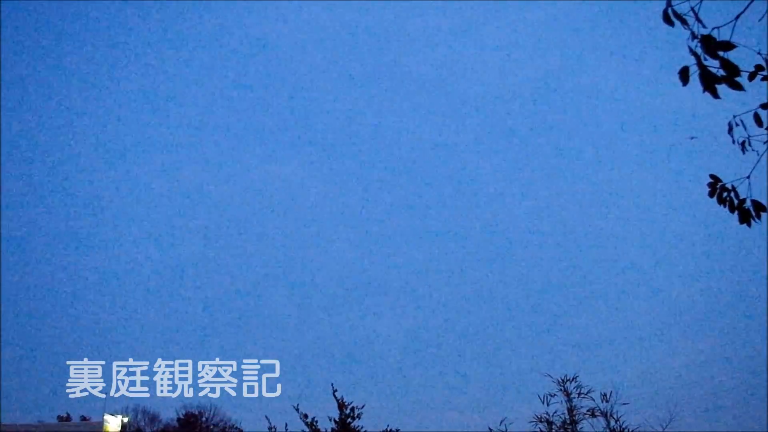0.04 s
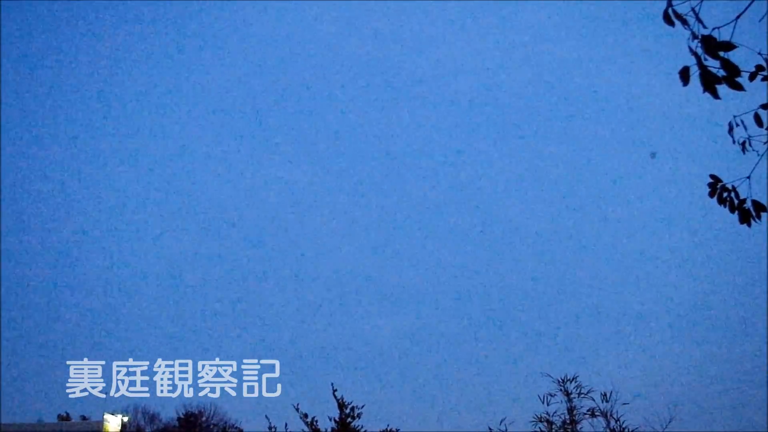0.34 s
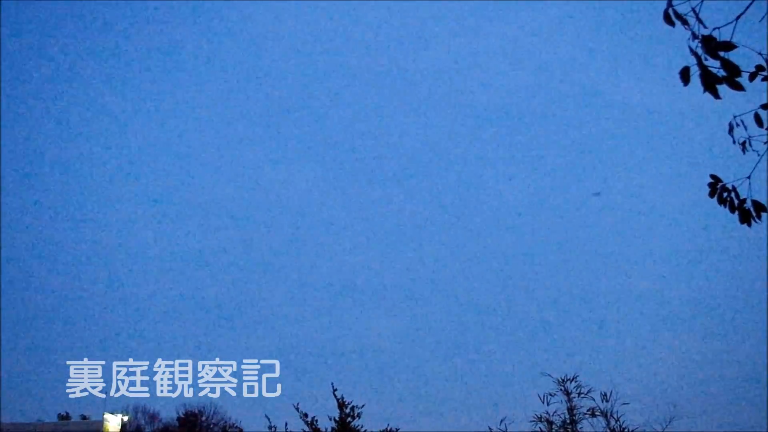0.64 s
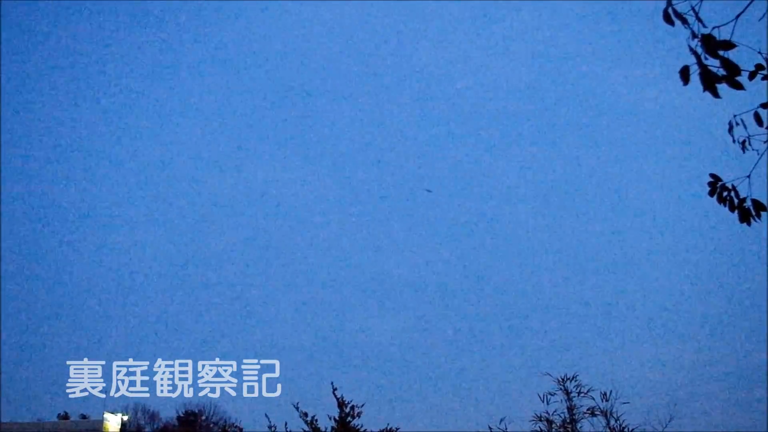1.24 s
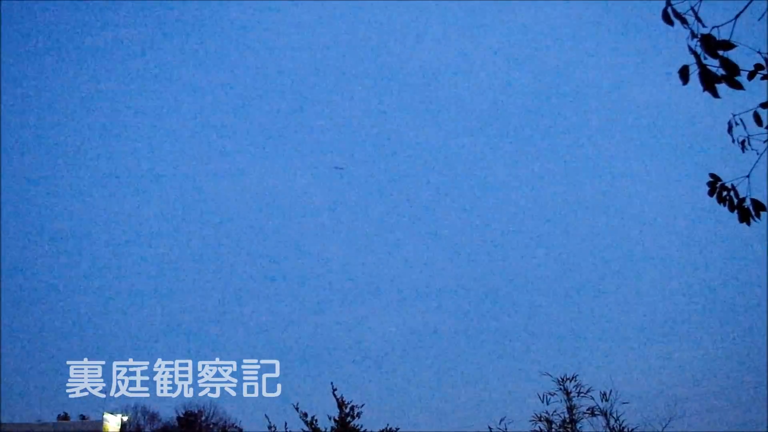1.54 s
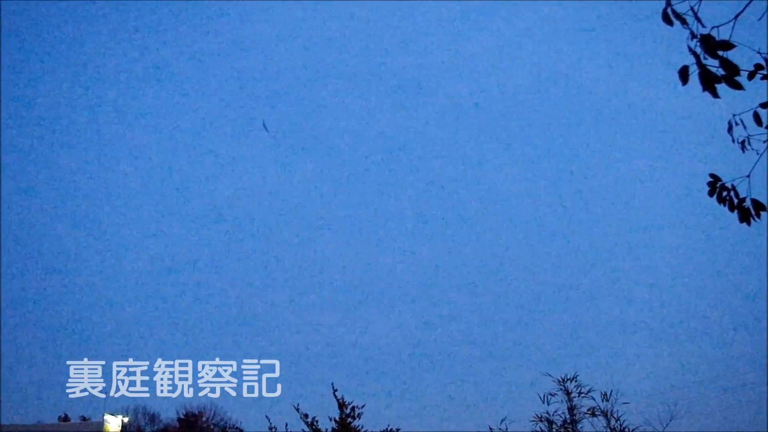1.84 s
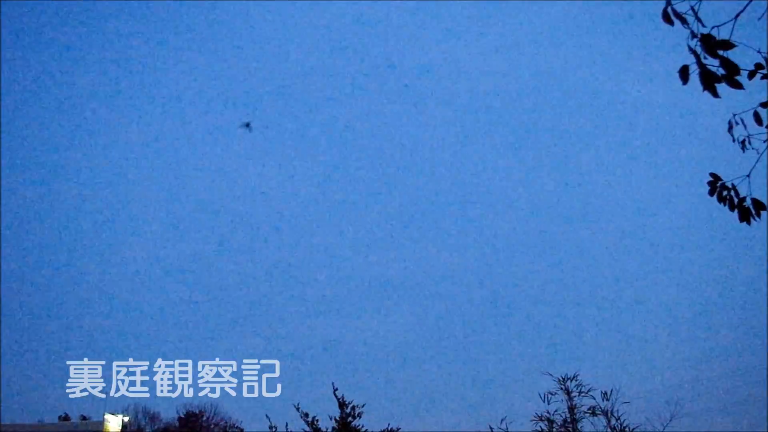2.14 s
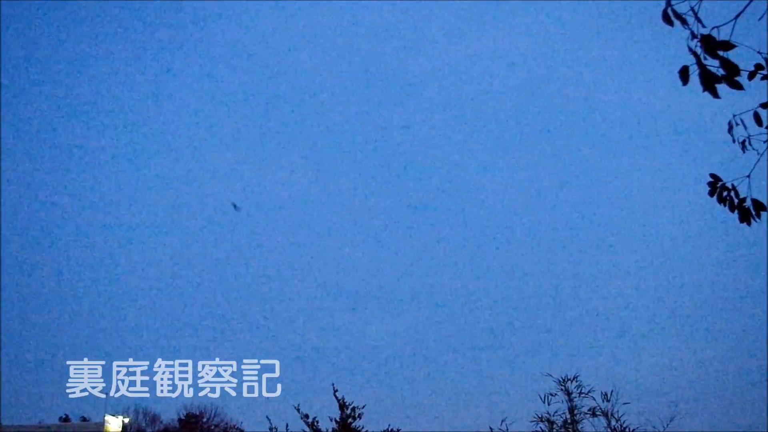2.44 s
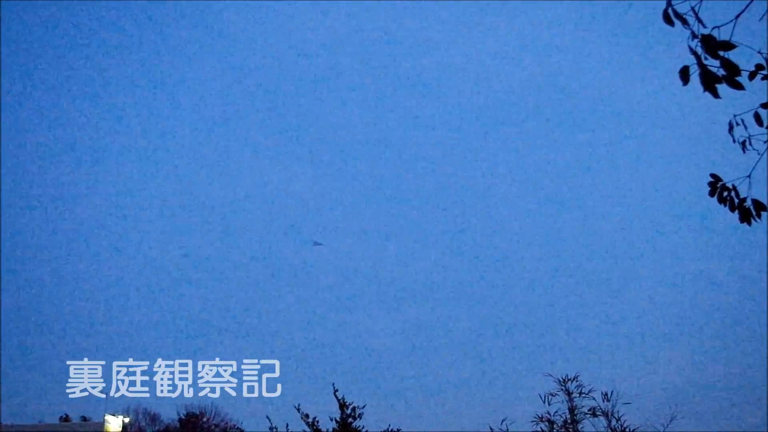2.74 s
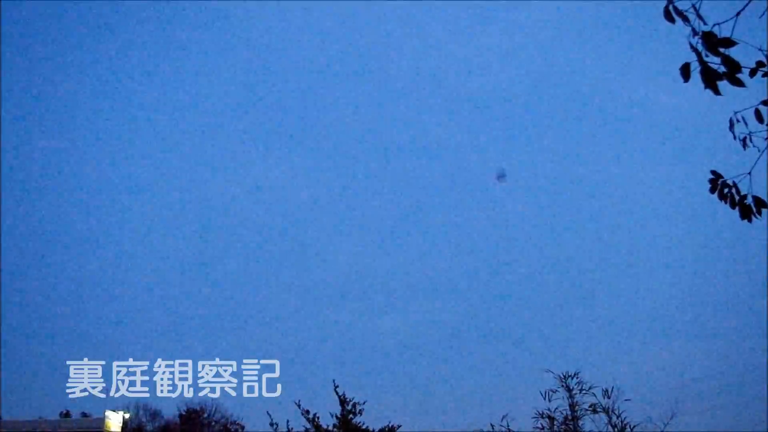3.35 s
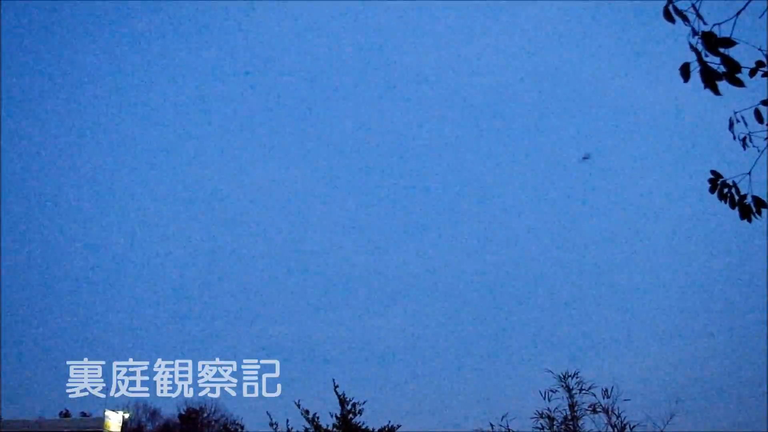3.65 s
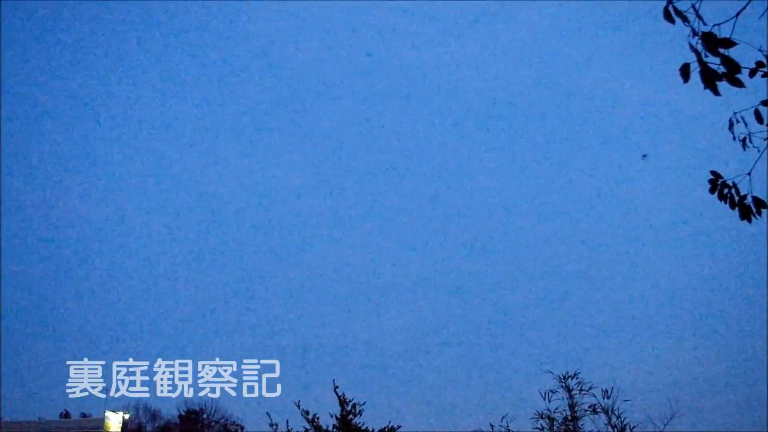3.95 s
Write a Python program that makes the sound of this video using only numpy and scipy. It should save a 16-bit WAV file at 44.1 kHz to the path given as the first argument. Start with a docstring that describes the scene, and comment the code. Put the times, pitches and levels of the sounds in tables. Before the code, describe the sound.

A bat's calls click from a close detector, dry and sharp with a tiny chirp and a quick echo. Around 0.5 seconds they speed into a short buzz, then settle to about ten uneven clicks a second. They quicken from 1.8 seconds into another buzz near 2.2, pause briefly, and resume from 2.5 until the end at 4. Faint hiss and distant town rumble continue throughout.

```python
"""Bats on a bat detector

Bats hunt over a garden at dusk. A detector makes their very high calls audible by playing the gap
between each call's pitch and its own tuning. A call slides down past the tuning, so the note dives
to zero and climbs again. Ground and leaves echo it. Twice the calls speed up into a feeding buzz,
over faint hiss and the rumble of a distant town."""
import sys
import numpy as np
from scipy import signal
from scipy.fft import rfft, irfft
from scipy.io import wavfile
from scipy.ndimage import uniform_filter1d

SR = 44100
rng = np.random.default_rng(int(sys.argv[2]) if len(sys.argv) > 2 else 0)


def wav_record(signal):
    """Record a signal, one row per channel, as 16-bit PCM in the file named by sys.argv[1]."""
    frames = np.transpose(np.atleast_2d(signal))
    bounded = np.clip(frames, -1, 1)
    # unit amplitude maps onto the largest positive 16-bit level
    quanta = np.round(bounded * 32767).astype(np.int16)
    wavfile.write(sys.argv[1], SR, quanta)


N = 176400  # 4 seconds

CALL_DB, ECHO_DB, OVERTONE_DB = 3, 0.2, -1.5  # added to the levels in the table
# One row per call. Pitches count from the detector's tuning; swell is the rise in level over the call.
# start_s, length_s, level_db, start_pitch_hz, end_pitch_hz, swell_db, echo_db, echo_fade_s, overtone_db
CALLS = [(0.038, 0.0041, -19, 3230, -3560, -4, 6, 0.0095, -53),
         (0.0484, 0.0074, -18, 4600, -2840, -1, -2.5, 0.011, -42),
         (0.1251, 0.0029, -14, 2680, -2540, -15, -4, 0.012, -70),
         (0.1494, 0.0023, -31, 300, -4120, 16, -4, 0.0092, -70),
         (0.1934, 0.0022, -10.5, 700, -2650, -3, -6, 0.011, -48),
         (0.2522, 0.0025, -15, 2710, -2430, -8, -5, 0.018, -70),
         (0.3186, 0.0014, -11.1, 2380, -1910, -9, -3.5, 0.018, -46),
         (0.3819, 0.002, -16.5, 2430, -1920, -21, -5, 0.011, -56),
         (0.4252, 0.0031, -22.5, 400, -3840, -13, -2, 0.015, -56),
         (0.441, 0.002, -17, 2560, -2310, -27, -8, 0.0071, -72),
         (0.4888, 0.0015, -16, 2440, -2310, -21, -10, 0.0098, -59),
         (0.524, 0.0014, -25.5, 2400, -4070, -11, 4, 0.025, -61),
         (0.536, 0.003, -20.8, 2900, -2510, 2, -11, 0.006, -55),
         (0.548, 0.0017, -18, 2620, -2990, -20, -5, 0.0069, -70),
         (0.5591, 0.0013, -14.5, 2400, -3480, -19, -6, 0.0084, -52),
         (0.568, 0.0019, -18.5, 400, -2200, -23, -10, 0.006, -52),
         (0.578, 0.00133, -17.5, 600, -3040, -13, -9, 0.006, -53),
         (0.5846, 0.0019, -21, 2500, -2860, 4, -14, 0.0053, -47),
         (0.5912, 0.00483, -29, 3920, -2910, -14, -4, 0.006, -65),
         (0.6016, 0.0015, -24, 2600, -2520, 9, 2, 0.0052, -49),
         (0.6057, 0.00137, -24, 2480, -1930, 17, -1, 0.006, -42),
         (0.6144, 0.00162, -21, 2420, -2950, -21, -14, 0.006, -54),
         (0.6186, 0.00125, -29, 2300, -3710, -8, 0, 0.02, -70),
         (0.6285, 0.002, -22.5, 2810, -1860, -24, 5.5, 0.051, -53),
         (0.6363, 0.0057, -15.5, 596, -3730, -7, -6, 0.0085, -40),
         (0.7397, 0.0039, -15, 500, -3720, -13, -3.5, 0.0084, -28.5),
         (0.844, 0.0049, -16, 3100, -3860, -2, -1, 0.0047, -41),
         (0.8612, 0.004, -13.5, 2720, -3400, -4, -1.5, 0.0093, -47),
         (0.9322, 0.0064, -26, 3200, -4050, -11, 3, 0.0064, -70),
         (0.9394, 0.0057, -20, 11810, -2050, 1, 3.5, 0.011, -48),
         (1.0154, 0.0062, -17, 11360, -2600, 11.5, 4, 0.0098, -43),
         (1.0972, 0.0074, -18, 12900, -2760, 10, 3, 0.0087, -32.5),
         (1.1383, 0.0021, -20, 1100, -2390, -2, -1.5, 0.011, -70),
         (1.184, 0.0059, -19, 11240, -2270, 3.5, 8.5, 0.009, -38),
         (1.241, 0.0036, -25.5, 3480, -2120, -14, 5, 0.0063, -70),
         (1.272, 0.0059, -15, 12060, -2070, 14, 3, 0.0091, -50),
         (1.3102, 0.0025, -21, 3000, -2370, 9, 2.5, 0.0074, -70),
         (1.3406, 0.0053, -13, 11950, -1480, 15.5, -2, 0.01, -51),
         (1.38, 0.0021, -25.5, 2600, -2400, 17, -2, 0.022, -70),
         (1.4313, 0.011, -21.5, 11100, -2850, -5, 7, 0.0094, -36.5),
         (1.525, 0.0065, -18, 13010, -3670, 0, 5.5, 0.0076, -43),
         (1.6133, 0.0084, -18, 12000, -3200, -3, 1, 0.011, -29),
         (1.749, 0.0095, -18.5, 11900, -3170, -7, 3.5, 0.01, -31),
         (1.8153, 0.0035, -14, 10260, -2240, -5, 2.5, 0.0078, -34),
         (1.884, 0.0031, -15.1, 11020, -1740, -1, 3.5, 0.0078, -45),
         (1.9767, 0.0029, -26, 2650, -3950, 4, 0, 0.018, -70),
         (1.983, 0.0022, -14, 11760, -1740, 4, -0.5, 0.0076, -47),
         (2.0491, 0.0021, -13, 11220, -1370, 7, 2.5, 0.011, -47),
         (2.0606, 0.0067, -24, 4510, -3200, -10, -16, 0.0072, -70),
         (2.1117, 0.002, -11, 10840, -1940, 2, -1, 0.0095, -47),
         (2.1612, 0.0021, -16.5, 11660, -800, 2, 5.5, 0.013, -50),
         (2.168, 0.004, -17, 800, -2370, 9, -11, 0.01, -57),
         (2.2027, 0.0022, -18.5, 11220, -810, -2, 4, 0.037, -70),
         (2.2328, 0.0015, -14, 400, -2360, -11, -10, 0.011, -70),
         (2.2395, 0.0015, -19, 2500, -4180, -20, 0, 0.025, -63),
         (2.2472, 0.0021, -19, 200, -2340, 6, -14, 0.006, -70),
         (2.257, 0.0016, -23, 300, -2040, -13, -0.5, 0.048, -57),
         (2.2617, 0.002, -28, 2700, -3130, 8, -3, 0.013, -70),
         (2.275, 0.0012, -24.5, 200, -3260, 15, -5.5, 0.018, -63),
         (2.465, 0.0043, -15, 12790, -3670, 9, 3.5, 0.011, -24.5),
         (2.5408, 0.00421, -13, 3890, -2660, -4, 1.5, 0.012, -38),
         (2.6563, 0.0044, -18, 11150, -2370, 6.5, 8, 0.0082, -53),
         (2.7448, 0.0055, -18, 11080, -2900, 6, 4.5, 0.009, -35),
         (2.8382, 0.0074, -39, 200, -3800, -5, -4, 0.006, -70),
         (2.903, 0.0056, -19.5, 11340, -1710, 6.5, 9, 0.0074, -52),
         (2.978, 0.0041, -14.5, 11270, -1750, 6, 2, 0.0075, -55),
         (3.027, 0.0029, -27, 700, -3810, -2, -2, 0.0073, -70),
         (3.0452, 0.0026, -15.5, 11680, -2120, 11, 7.5, 0.0078, -42),
         (3.1342, 0.0083, -18.5, 11150, -1980, 10, 3.5, 0.0093, -30),
         (3.21, 0.0037, -27, 3670, -3160, 7, 4, 0.012, -70),
         (3.224, 0.0079, -22.5, 13000, -3540, 0, 5, 0.011, -38),
         (3.324, 0.0097, -19.5, 10790, -2600, 3, 3, 0.0061, -36.5),
         (3.3921, 0.0026, -19, 500, -3440, 1, -3, 0.009, -70),
         (3.4153, 0.0073, -21, 11040, -3470, 11, 4.5, 0.0085, -36),
         (3.503, 0.0015, -25.0, 2480, -3080, 21, -4, 0.0047, -70),
         (3.5071, 0.0066, -19, 11150, -2360, 10, 4, 0.01, -48),
         (3.599, 0.011, -24, 11610, -2630, 0, 5.5, 0.0081, -49),
         (3.6452, 0.0043, -20, 3040, -3840, -11, -0.5, 0.0091, -70),
         (3.676, 0.0024, -15.5, 11140, -1880, 25.5, -1, 0.012, -68),
         (3.7337, 0.003, -17, 10620, -2640, 7, -1.5, 0.0099, -56),
         (3.7484, 0.0037, -16.5, 2800, -3690, -11, -9, 0.011, -70),
         (3.7982, 0.002, -15, 13080, -2260, 12, -0.5, 0.0058, -62),
         (3.836, 0.0028, -22.5, 500, -3750, -13, -4.5, 0.01, -70),
         (3.8802, 0.01, -23.5, 11800, -1710, 7, 7.5, 0.0054, -37.5),
         (3.9249, 0.0016, -24.5, 500, -3340, 4, 0.5, 0.0082, -70),
         (3.971, 0.0047, -15, 300, -3650, -7, -4.5, 0.01, -36.5)]


def bats():
    """The whole hunt: one track of notes with their echoes, and one of overload crunch."""
    notes, crunch = np.zeros((2, N))
    for start_s, *row in CALLS:
        note, overtones = bat_call(*row)
        add(notes, start_s, note)
        add(crunch, start_s, overtones)
    return notes, crunch


def bat_call(length_s, level_db, start_hz, end_hz, swell_db, echo_db, echo_fade_s, overtone_db):
    """One falling call as the detector hears it, and the gritty overtones of its loud moment."""
    progress = np.linspace(0, 1, max(int(length_s * SR), 16))
    gap_hz = end_hz + (start_hz - end_hz) * (1 - progress) ** 2.5  # falls steeply, then flattens
    tone = np.exp(2j * np.pi * (np.cumsum(gap_hz) / SR + rng.random()))
    fade_in_out = np.sqrt(abs(np.sin(np.pi * progress)))
    call = tone * amp(CALL_DB + level_db + swell_db * (progress - .5)) * fade_in_out
    tilted = call * amp(progress - .5)  # a 1 dB tilt: the low end of a call carries farthest
    sound = echoes(tilted, echo_db, echo_fade_s)
    # A near call flares up briefly, about 70% of the way through.
    flare = amp(overtone_db) * abs(np.sin(np.pi * progress ** 2.1)) ** 7
    add(sound, 0, call + amp(11) * flare * tone)
    overtones = sum(3 / k * tone ** k for k in range(2, 6)).real
    grit = 1.9 * unit(uniform_filter1d(rng.standard_normal(len(sound)), 3))[:len(call)]
    return sound.real, amp(OVERTONE_DB) * flare * (overtones + grit)


def echoes(call, near_db, near_fade_s, far_db=-21, far_ring_s=0.16):
    """Ground and leaves send a call back: a quick near echo and a faint, longer far one."""
    t = np.arange(8000) / SR
    near = (t > 0.001) * np.exp(-.5 * (t / near_fade_s) ** 1.29)  # starts 1 ms late
    far = amp(-60 * t / far_ring_s)
    return amp(ECHO_DB + near_db) * scatter(call, near) + amp(far_db) * scatter(call, far)


def scatter(call, fade):
    """Many weak, random reflections, together as strong as the call."""
    paths = rng.standard_normal((len(fade), 2)) @ np.array([1, 1j])
    echo = signal.fftconvolve(call, paths * fade)
    return echo * np.linalg.norm(call) / (np.linalg.norm(echo) + 1e-12)


# How much of each pitch the detector's filter lets through: pitch_hz, gain_db
DETECTOR_FILTER = [(20, 0), (300, -1), (550, 0), (850, -1.5), (1350, 0.5), (1950, 0), (2600, 0), (3400, .7),
                   (3950, -0.2), (4300, -8.5), (5500, -13.5), (7000, -18.5), (10500, -18), (11500, -26),
                   (16000, -49)]
# The tone of the detector's own hiss: pitch_hz, relative_level_db
DETECTOR_HISS = [(20, 3), (1200, 5.5), (2000, 2), (3800, -6), (4400, -9), (7000, -28), (16000, -27.5)]
# How the small loudspeaker boosts or weakens each pitch: pitch_hz, gain_db
LOUDSPEAKER = [(20, -30), (200, -21.5), (330, -11), (480, 1.5), (750, -5), (1050, 0.5), (1330, 2),
               (1550, -1.5), (1950, -2), (2200, 4), (2520, 11.5), (2900, 6.5), (3080, 3.5), (3250, 1),
               (3400, 7), (3700, 5), (3950, 6.5), (4400, -3.5), (4700, 4.5), (5050, 2), (5200, 3.5),
               (5480, 6), (6000, -4), (6600, 3.5), (7500, -7), (8600, -8.5), (9600, 10.5), (11000, -4.5),
               (16000, 2)]


def detector(notes, crunch, ceiling=0.91):
    """Filtered notes and hiss pass an amplifier that loud calls overload, then a small loudspeaker."""
    audio = colour(notes, DETECTOR_FILTER) + noise(DETECTOR_HISS, level_db=-39.5)
    overloaded = ceiling * np.tanh(audio / ceiling)
    return colour(overloaded + crunch, LOUDSPEAKER)


# How much louder the left microphone is than the right: pitch_hz, gain_db
LEFT_LOUDER = [(60, 4.5), (250, 6), (480, 1.5), (770, 7), (1350, 4.5), (1800, 5), (2100, -7), (2400, -6),
               (2700, -8.5), (3000, -11.5), (3150, -3), (3400, -12.5), (3700, -8.5), (3920, -1), (4250, -7),
               (4700, -16.5), (5100, 4), (5500, -2.5), (6000, -17), (6600, -11.5), (9800, 4), (15000, -.5)]
# How far the wave at the left microphone runs ahead of the right: pitch_hz, lead_radians
LEFT_AHEAD = [(20, 0), (550, 0.37), (1100, -0.86), (1350, -1.34), (1500, -2.37), (1700, -1.66), (2020, -3),
              (2550, -2.5), (2980, -3.0), (3300, -9), (3750, -8.5), (4150, -9.5), (4750, -9.5),
              (5150, -15.5), (5300, -17), (6050, -17.5), (16000, -17.5)]


def microphones(sound):
    """Two microphones close together: each gets its own share and timing of every pitch."""
    hz = np.fft.rfftfreq(N, 1 / SR)
    ratio = amp(read(LEFT_LOUDER, hz))
    right = rfft(sound) / np.sqrt(1 + ratio ** 2)
    left = right * ratio * np.exp(1j * read(LEFT_AHEAD, hz))
    return irfft(np.array([left, right]), N)


def nearby_reflections(sound, level_db=-13.5, ring_s=0.023):
    """Short reflections from around the loudspeaker, different at each microphone."""
    t = np.arange(2400) / SR
    tail = rng.standard_normal((2, len(t))) * amp(-60 * t / ring_s)
    return amp(level_db) * signal.fftconvolve(sound[None], tail / np.linalg.norm(tail), axes=1)[:, :N]


# The tone of the distant town: pitch_hz, relative_level_db
TOWN_RUMBLE = [(10, -17), (25, -4), (38, -1), (52, -5.5), (62, 1), (71, 0.5), (80, 0), (95, -2.5),
               (130, -5.5), (200, -10.5), (300, -13), (500, -12), (800, -12.5), (1300, -24.5), (2000, -29),
               (5000, -56), (16000, -74)]


def town_rumble():
    """The far-off town blurs into a steady, low noise."""
    return noise(TOWN_RUMBLE, level_db=-37)


# The tone of the microphones' hiss: pitch_hz, relative_level_db
MICROPHONE_HISS = [(20, 10), (500, 14), (2000, 8.5), (5000, -1), (10000, -1.5), (15000, -4.5), (16000, -31)]
# How that hiss grows louder and softer: time_s, relative_level_db
HISS_DRIFT = [(0.0, -62), (0.61, -60), (0.71, -61), (0.9, -64), (1.75, -62.5), (2.96, -65), (4.0, -65.5)]


def microphone_hiss(shared=0.7):
    """Faint hiss, mostly the same on both sides, slowly drifting in level."""
    time_s, level_db = np.transpose(HISS_DRIFT)
    drift = unit(amp(np.interp(np.arange(N) / SR, time_s, level_db)))
    both, *own = [noise(MICROPHONE_HISS, level_db=-50.5) for _ in range(3)]
    return drift * (np.sqrt(shared) * both + np.sqrt(1 - shared) * np.array(own))


def amp(db):
    """Turns decibels into a number to multiply by."""
    return 10 ** (np.asarray(db) / 20)


def unit(sound):
    """Scales a sound to an average power of one."""
    return sound / np.sqrt(np.mean(abs(sound) ** 2) + 1e-20)


def read(table, hz):
    """Looks up pitches in a table, blending between rows on a musical (log) scale."""
    pitch_hz, value = np.transpose(table)
    return np.interp(np.log(hz + 1), np.log(pitch_hz + 1), value)


def add(mix, start_s, sound):
    """Mixes a sound in at the given time."""
    part = mix[max(round(start_s * SR), 0):][:len(sound)]
    part += sound[:len(part)]


def colour(sound, table, size=4096):
    """Boosts or weakens each pitch as a table says, ringing only after the sound arrives."""
    log_gain = np.log(amp(read(table, abs(np.fft.fftfreq(size, 1 / SR)))))
    ring = np.fft.ifft(np.exp(np.conj(signal.hilbert(log_gain)))).real
    return signal.oaconvolve(sound, ring[:size // 2])[:N]


def noise(table, level_db):
    """Steady noise with a table's tone and the given overall level."""
    gain = amp(read(table, np.fft.rfftfreq(N, 1 / SR)))
    return amp(level_db) * unit(irfft(rfft(rng.standard_normal(N)) * gain, N))


def scene():
    """The detector close by, the town far off."""
    speaker = detector(*bats())
    return microphones(speaker + town_rumble()) + nearby_reflections(speaker) + microphone_hiss()


def record(dry, ceiling=0.75, cutoff_hz=15700):
    """Flattens the loudest clicks, then cuts off the highest treble."""
    flattened = dry / (1 + (dry / ceiling) ** 8) ** (1 / 8)
    treble_cut = signal.firwin(301, cutoff_hz, window=("kaiser", 9), fs=SR)
    return signal.oaconvolve(flattened, treble_cut[None], "same")


dry = scene()
out = record(dry)
wav_record(out)
```